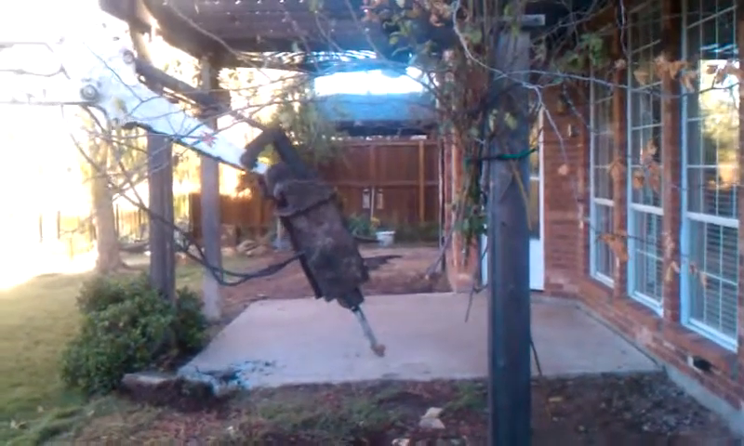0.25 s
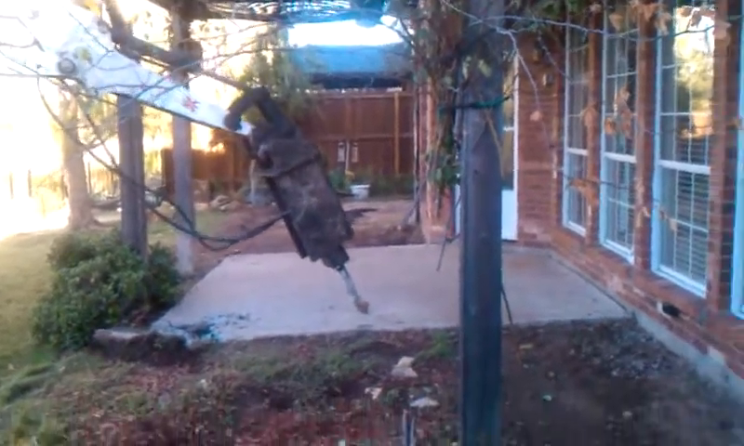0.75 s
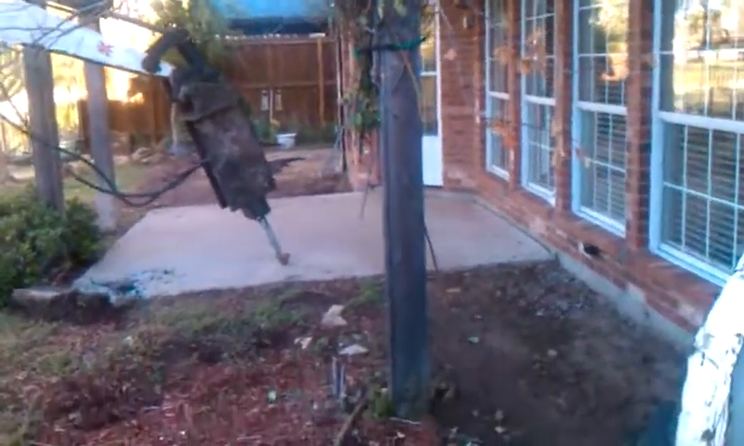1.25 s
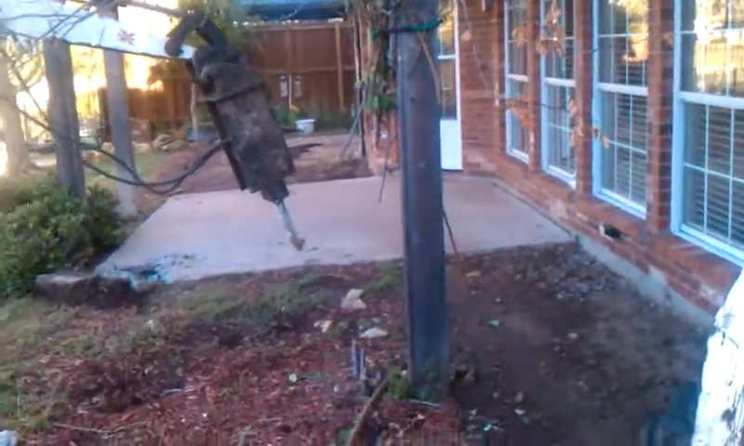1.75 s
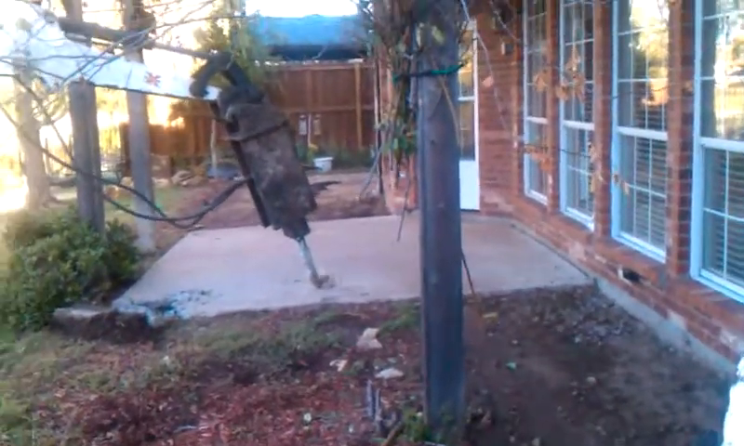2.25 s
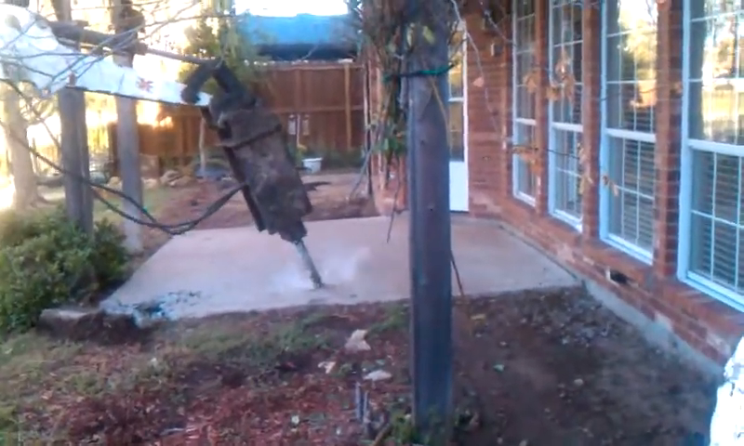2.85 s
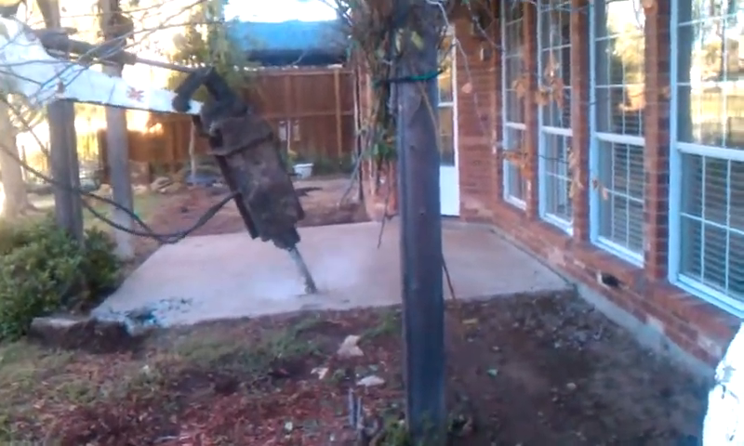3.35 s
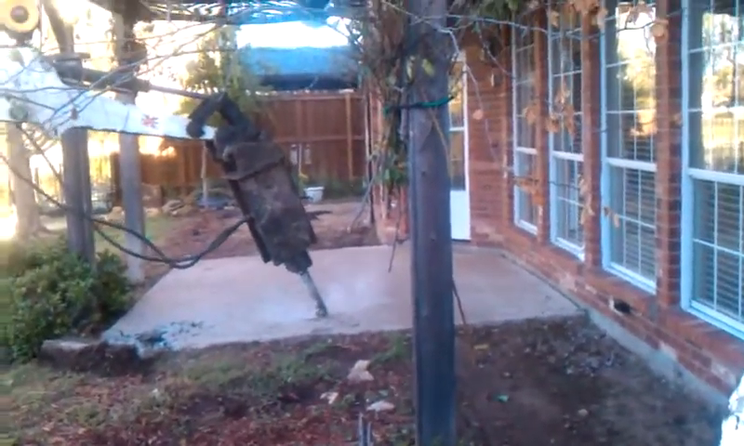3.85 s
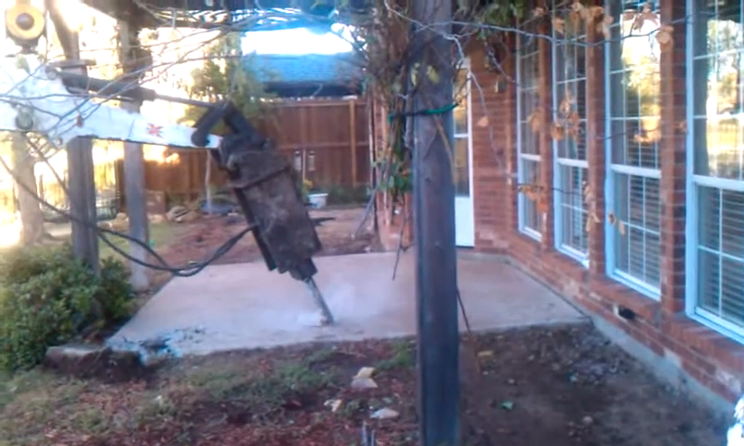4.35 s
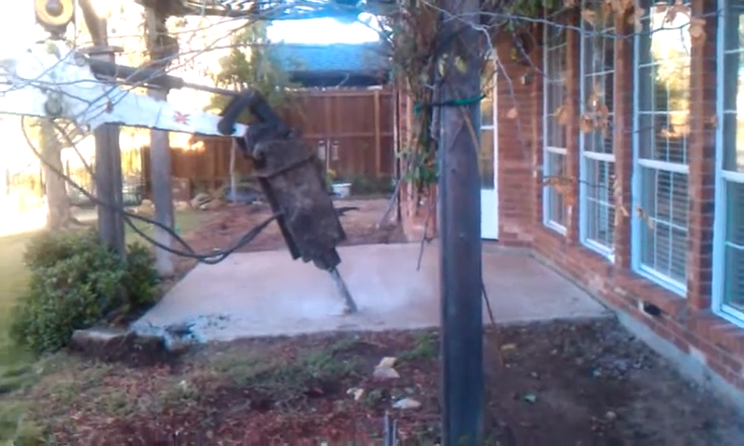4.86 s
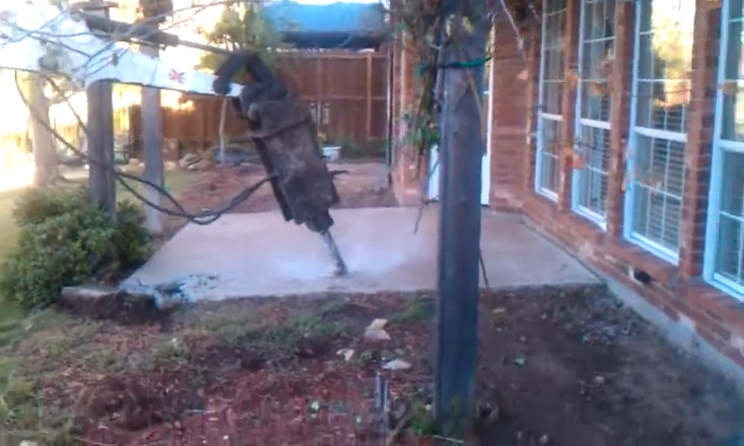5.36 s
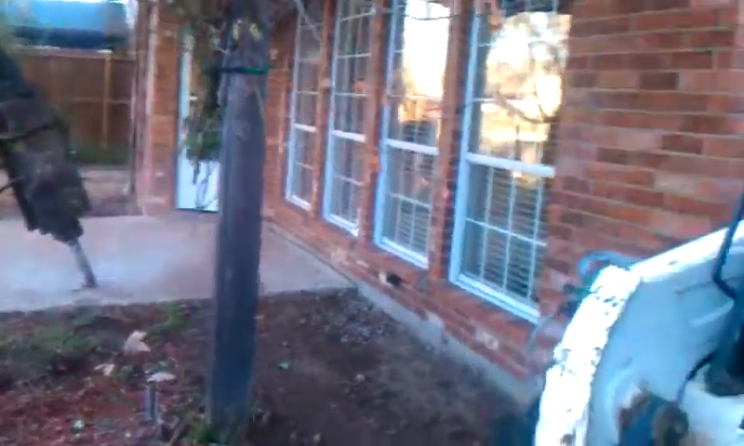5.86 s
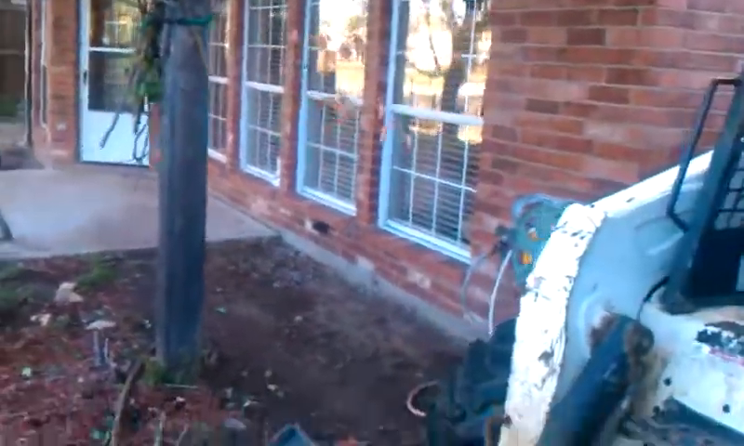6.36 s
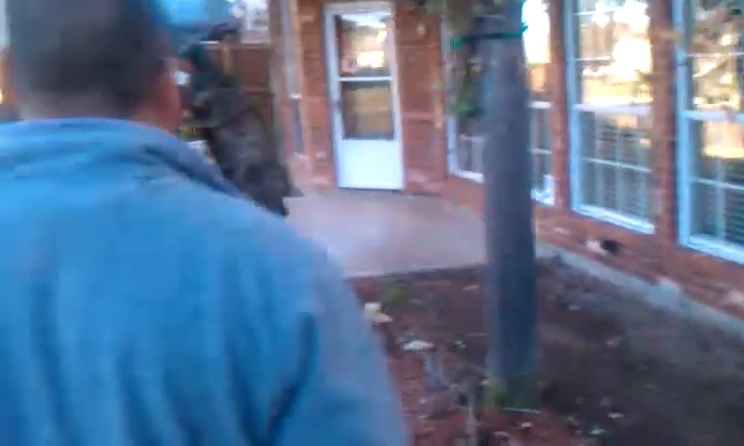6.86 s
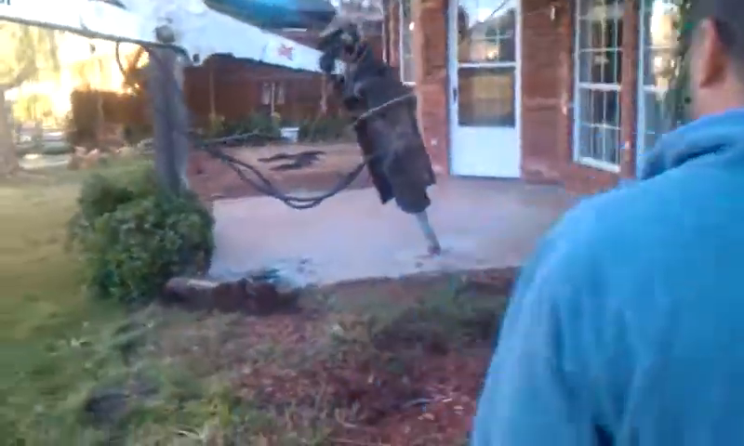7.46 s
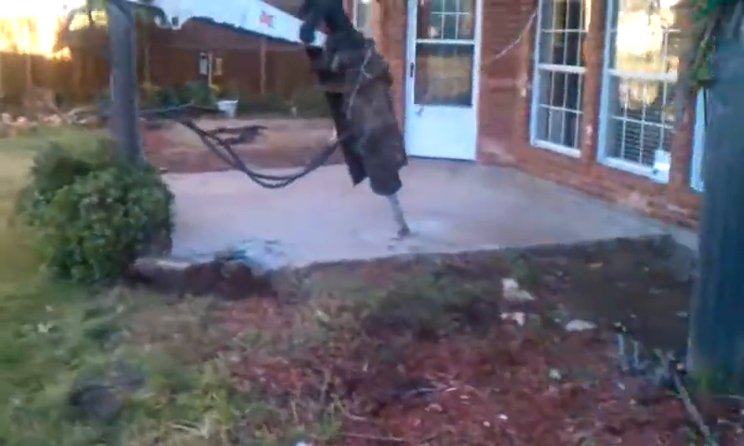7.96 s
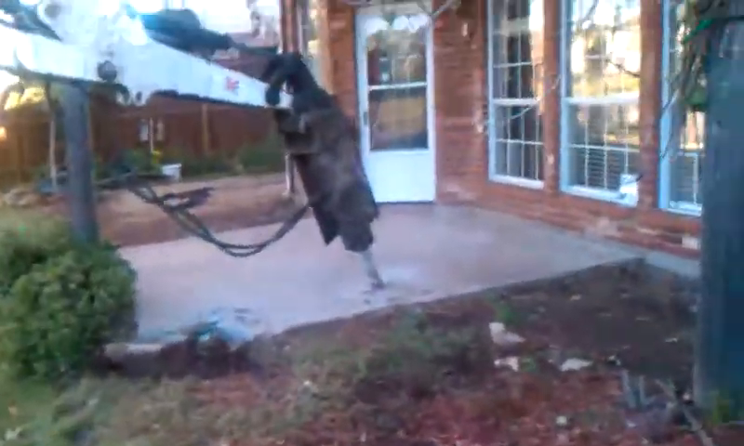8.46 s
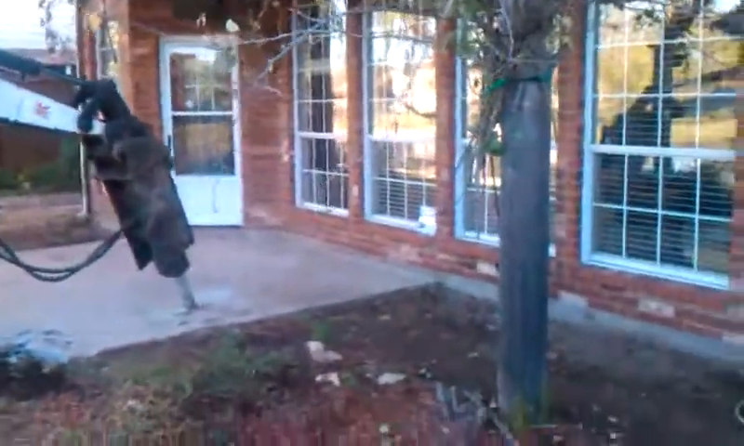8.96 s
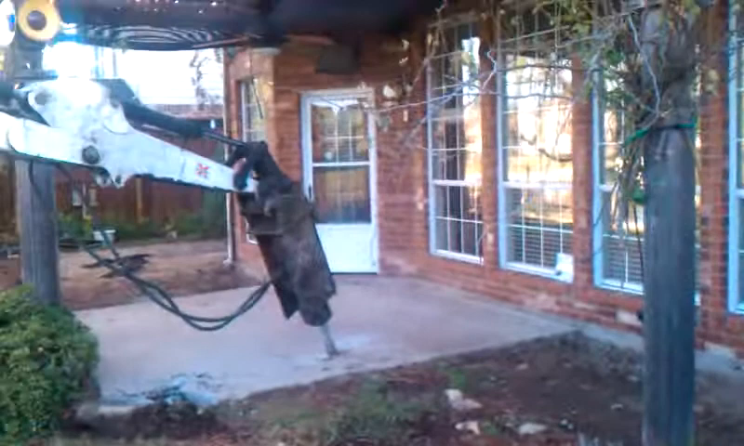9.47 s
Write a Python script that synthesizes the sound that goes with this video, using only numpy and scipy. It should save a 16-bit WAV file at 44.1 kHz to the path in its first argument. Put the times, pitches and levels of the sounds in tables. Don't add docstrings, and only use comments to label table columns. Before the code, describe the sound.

Loader engine chugging and boom knocks give way to a steel chisel pounding a patio slab about ten times a second, rattling and ringing continuously.

```python
import sys
import numpy as np
from scipy import signal
from scipy.fft import rfft, irfft
from scipy.io import wavfile

SR = 44100
rng = np.random.default_rng(int(sys.argv[2]) if len(sys.argv) > 2 else 0)


def gain_from_db(level_db):
    decades = np.asarray(level_db, float) / 20
    return 10 ** decades


def persist_wave(psi):
    counts = np.round(np.clip(psi, -1, 1) * 32767).astype(np.int16)
    wavfile.write(sys.argv[1], SR, np.atleast_2d(counts).T)


N = 429093

LANDING_S = 2.217
SKIP_S = 4.1993


def unit(x):
    return x / np.sqrt(np.mean(x ** 2) + 1e-20)


def in_time(rows):
    s, *columns = np.transpose(rows)
    return [np.interp(np.arange(N) / SR, s, c) for c in columns]


def at_hz(points, hz):
    point_hz, value = np.transpose(points)
    return np.interp(np.log(hz), np.log(point_hz), value)


def drift(rate):
    knots = rng.standard_normal(int(N / SR * 60))
    return unit(np.interp(np.arange(N) / SR * rate, np.arange(len(knots)), knots))


def clicks(times_s, heights):
    out = np.full(N, 1e-18)
    index = np.clip((np.ravel(times_s) * SR).astype(int), 0, N - 1)
    np.add.at(out, index, np.ravel(heights))
    return out


def ring(x, hz, t60_s):
    r, w = gain_from_db(-60 / (t60_s * SR)), 2 * np.pi * hz / SR
    return signal.lfilter([0, np.sin(w)], [1, -2 * r * np.cos(w), r * r], x)


def fade(power, t60_s):
    return signal.lfilter([1], [1, -gain_from_db(-120 / (t60_s * SR))], power)


def bands(grain_db):
    grain = gain_from_db(grain_db * rng.standard_normal((2, N // 32 + 1))).repeat(32, axis=1)[:, :N]
    white = rng.standard_normal((2, N)) * grain
    edges_hz = 28 * 2 ** np.arange(0, 7.6, 1 / 3)
    for k, (low, high) in enumerate(zip(edges_hz, edges_hz[1:])):
        sos = signal.butter(2, [low, high], "band", fs=SR, output="sos")
        yield np.sqrt(low * high), signal.sosfilt(sos, white[k % 2])


def narrow(centre_hz, width_hz):
    sos = signal.butter(2, width_hz / 2, fs=SR, output="sos")
    a, b = signal.sosfilt(sos, rng.standard_normal((2, N)))
    phase = 2 * np.pi * np.cumsum(centre_hz) / SR
    return unit(a * np.cos(phase) + b * np.sin(phase))


def engine():
    # start_s, firings_per_s, exhaust_db, block_hz
    running = [(0, 98, -47, 1750), (.3, 89.3, -48.5, 1760), (.9, 90.2, -41, 1714), (1.8, 90.8, -40.5, 1813),
               (2.21, 91.2, -45.5, 1872), (3.0, 120, -51, 1872), (6.3, 87, -50.5, 1807),
               (9.73, 86, -51, 1702)]
    # shaft_multiple, level_db
    orders = [(2, -4.5), (3, -21), (4, 0.5), (5, -9.5), (8, -5), (9, -5), (12, -4), (20, -5.5), (28, -5),
              (60, -4.5)]
    # band_hz, level_db_per_hz
    knock_colour = [(18, -55), (30, -24.5), (75, -10), (130, -14), (175, -9.5), (314, -12), (400, -9),
                    (896, -9.5), (1130, -8), (1750, -2), (2300, -6), (2800, -4.5), (3400, -16),
                    (4500, -21.5)]
    firing_hz, exhaust_db, block_hz = in_time(running)
    t = np.arange(N) / SR

    since_s = np.maximum(t - LANDING_S, 0)
    duck_db, duck_s, nearing_db_per_s = -10, 0.03, 0.5
    knock_db = -26 + duck_db * np.minimum(since_s / duck_s, 1) + nearing_db_per_s * since_s

    turns = np.cumsum(firing_hz / 2 * (1 + .0025 * drift(12))) / SR
    exhaust = 0
    for k, db in orders:
        exhaust = exhaust + gain_from_db(db + 1.9 * drift(18)) * np.sin(2 * np.pi * (k * turns + rng.random()))

    firing = (2 * turns).astype(int)
    strength = gain_from_db(2.0 * rng.standard_normal(1000))[firing]
    gate = 0.74 + strength * np.exp(-3.0 * (2 * turns % 1))
    knock = 0
    for hz, noise in bands(grain_db=0.7):
        share = np.clip(np.log(hz / 500) / 2.1, 0, 1)
        knock = knock + gain_from_db(at_hz(knock_colour, hz) + 1.3 * drift(14)) * gate ** share * noise

    strain_s, strain_db = 0.45, 3.5
    strain = np.interp(t, [LANDING_S - strain_s, LANDING_S], [0, 1], right=0)
    block = unit(gate * narrow(block_hz * (1 + .015 * drift(20)), width_hz=200))
    body = gain_from_db(2.0) * unit(knock) + gain_from_db(-4.5 + strain_db * strain) * block
    return np.sqrt(2) * gain_from_db(exhaust_db) * exhaust + gain_from_db(knock_db) * body


def linkage():
    # start_s, peak_db, pitch_hz, t60_s
    clunks = [
        (0.515, -17, 951, 0.036),
        (0.921, -14, 1250, .025),
        (0.927, -16, 448, 0.035),
        (0.94, -12.5, 205, 0.041),
        (1.862, -20.5, 172, .12),
        (2.219, -13, 1915, .12),
        (2.221, -19, 3450, 0.25),
        (2.22, -10.5, 1000, 0.015),
    ]
    out = 0
    for s, db, hz, t60_s in clunks:
        hit_and_bounce = clicks(s + np.array([0, .006]), gain_from_db(db + np.array([0, -7])))
        out = out + ring(hit_and_bounce, hz, t60_s)
    return out


def blows():
    # start_s, blows_per_s
    pace_curve = [(2.364, 9.059), (3.5, 8.604), (4.2, 9.253), (5.7, 9.474), (6, 9.591), (6.6, 9.655),
                  (7, 10.085), (8, 10.187), (8.4, 9.88), (8.9, 10.3), (9.73, 10.343)]
    # start_s, clatter_db, thud_over_clatter_db
    bite = [(2.2, -23, -11), (2.9, -24, -7.5), (3.9, -23, -3.5), (4.4, -24.5, -5.5), (5.6, -24.8, -4.5),
            (6.3, -24.5, -4), (6.5, -26.5, -10.5), (7.2, -23, -9.5), (8.6, -25, -10), (9.0, -24.5, -5.5),
            (9.73, -26.2, -4)]
    t, (pace,) = np.arange(N) / SR, in_time(pace_curve)
    first_s, skipped_blows = pace_curve[0][0], 0.192
    done = np.cumsum(pace * (t >= first_s)) / SR + skipped_blows * (t > SKIP_S)
    s = np.r_[LANDING_S, first_s, t[1:][np.diff(done.astype(int)) > 0]]
    luck = rng.standard_normal((len(s), 3)).T
    clatter_db, thud_db = (c[(s * SR).astype(int)] for c in in_time(bite))
    return s, clatter_db + 0.7 * luck[0], thud_db + 1.2 * luck[1], -13.5 + 3 * luck[2]


def contact_envelope(loose_s, contact_db, wet_db, t60_s):
    chance_db = 1.4 * rng.standard_normal(loose_s.shape)
    power = clicks(loose_s, gain_from_db(2 * (contact_db + chance_db)))
    return np.sqrt(fade(power, t60_s) + gain_from_db(2 * wet_db) * fade(power, 2.6))


def loose_clatter(loose_s, steel_db, clatter_db, thud_db, bright_db, place, wet_db):
    # band_hz, level_db_per_hz
    near = [(35, -43), (60, -16), (177, -7.5), (400, -4), (544, -11), (800, -8.5), (1470, -11.5),
            (1930, -11), (2800, -10.5), (3400, -9.5), (4500, -7)]
    side_on = [(35, -45), (60, -17.5), (177, -6.5), (400, -8), (675, -9), (885, -9.5), (1500, -9.5),
               (2070, -9.5), (2800, -11.5), (3500, -10.5), (4500, -6)]
    shadowed = [(35, -45.5), (60, -20), (168, -5.5), (294, -6.5), (380, -9.5), (1120, -10.5), (1470, -12.5),
                (1860, -10.5), (2800, -11), (3430, -11), (4500, -9)]
    # band_hz, t60_s
    decay = [(100, 0.37), (400, .22), (1500, 0.4), (3000, 0.36), (3600, 0.088), (4200, 0.13)]
    out = 0
    for hz, noise in bands(grain_db=0.33):
        low = np.interp(np.log(hz), np.log([300, 700]), [1, 0])
        high = np.interp(np.log(hz), np.log([2800, 3800]), [0, 1])
        blow_db = clatter_db + low * (thud_db + 7.5) + high * (bright_db + 15.5)
        blow = contact_envelope(loose_s, blow_db[:, None] + steel_db, wet_db - 3.1 * high, at_hz(decay, hz))
        colour_db = np.interp(place, [0, 1, 2], [at_hz(c, hz) for c in (near, side_on, shadowed)])
        rumble_cut_db = -3 * (140 < hz < 280)
        out = out + gain_from_db(colour_db + rumble_cut_db + 1.3 * drift(25)) * blow * noise
    return unit(out)


def struck(modes, when_s, blow_db, contact_db, shade, spread_db):
    out = 0
    for k, (hz, level_db, t60_s, shade_db) in enumerate(modes):
        luck = rng.standard_normal(when_s.shape)
        hit_db = (blow_db + shade * shade_db)[:, None] + contact_db + level_db + spread_db * luck
        out = out + (-1) ** k * ring(clicks(when_s, gain_from_db(hit_db)), hz, t60_s)
    return out


def thumps(s, level_db, shade):
    # delay_s, pitch_hz, over_thud_db, shadow_change_db
    pushes = [
        (.012, 178, 10, -5),
        (.016, 238, 6.5, -5),
        (.014, 386, 3, -6.5),
        (.066, 180, 1, 9.5),
        (0.069, 240, -2, 9),
    ]
    t60_s, rise_s = 0.095, 0.006
    out = 0
    for late_s, hz, db, shade_db in pushes:
        height = gain_from_db(level_db + db + shade * shade_db + 2.5 * rng.standard_normal(len(s))) / 2
        pair_s = s[:, None] + late_s + [0, round(rise_s * hz) / hz]
        out = out + ring(clicks(pair_s, np.c_[height, height]), hz, t60_s)
    return out


def breaker():
    # delay_s, slab_db, steel_db
    stroke = [
        (0.0, -6.5, 3.5),
        (0.012, -3, 3),
        (0.018, 2, 1.5),
        (0.026, -5.5, -5),
        (0.042, -1.5, 1.5),
        (0.062, -9.5, -3),
        (0.076, -1.5, -7),
    ]
    # pitch_hz, level_db, t60_s, shadow_change_db
    slab_modes = [(109, -12, 0.22, 0), (173, -5.5, 0.12, -4.5), (234.45, -5, .14, -2.5),
                  (309.6, -6.5, 0.091, -0.5), (387, 0, .15, -9.5), (467.3, -9.5, 0.23, -10.5),
                  (518.5, -9, 0.14, -2.5), (665.4, -1, .12, -18.5), (826.3, -3, 0.11, -7.5)]
    # pitch_hz, level_db, t60_s, shadow_change_db
    steel_modes = [(1000, -5.5, 0.21, -2.5), (1235, 1, 0.14, 7.5), (1510, -10.5, 0.24, 1.5),
                   (1950, -7, 0.088, -4), (2180, -8.5, 0.077, 2.5), (2373, -4.5, 0.28, 6),
                   (2760, -4.5, 0.11, 4.5), (3330, -3.5, 0.17, 7), (3450, -0.5, 0.11, 3)]
    # start_s, place (0 near, 1 side on, 2 shadowed)
    walk = [(2.2, 0.34), (3.0, 0.05), (4.1, .2), (4.5, 0.62), (6.1, 1.05), (6.35, 1.5), (6.62, 2.05),
            (6.82, 2.5), (7.0, 1.45), (8.5, 2.05), (9.73, 1.8)]
    # place, porch_db, steel_ring_db, housing_hz, housing_db
    place_table = [(0, -17.5, -2, 2050, -10), (.3, -20.5, -1.5, 2050, -9.5), (.62, -12, 0.5, 2100, -10),
                   (1.05, -11, -7, 2070, -16), (1.45, -13, -5.5, 1520, -8), (2.05, -11, -6, 1518, -8),
                   (2.5, -12.5, -4.5, 1950, -7.5)]
    s, clatter_db, thud_db, bright_db = blows()
    delay_s, slab_db, steel_db = np.transpose(stroke)
    place, = in_time(walk)
    places, *heard = np.transpose(place_table)
    wet_db, ring_db, housing_hz, housing_db = (np.interp(place, places, c) for c in heard)
    shade = np.clip(place[(s * SR).astype(int)] - 1, 0, 1)
    tight_s = s[:, None] + delay_s
    loose_s = tight_s + .0015 * rng.standard_normal(tight_s.shape) * (delay_s > 0)

    clatter = loose_clatter(loose_s, steel_db, clatter_db, thud_db, bright_db, place, wet_db)
    rattle = unit(contact_envelope(loose_s, clatter_db[:, None] + steel_db, wet_db - 4.0, 0.36))
    housing = rattle * narrow(housing_hz * (1 + .04 * drift(22)), width_hz=220)
    return_db = 4 * shade[:, None] * (delay_s > .07)
    thud = struck(slab_modes, tight_s, clatter_db + thud_db - 1.0, slab_db + return_db, shade, spread_db=1.5)
    steel = gain_from_db(ring_db) * struck(steel_modes, loose_s, clatter_db - 14.5, steel_db, shade, spread_db=6.0)
    noise = gain_from_db(-25) * (clatter + gain_from_db(housing_db + 2.3 * drift(18)) * housing)
    return noise + thud + steel + thumps(s, clatter_db + thud_db, shade)


def scene():
    return (breaker() + engine() + linkage())[None]


def low_pass(x):
    return signal.sosfilt(signal.butter(12, 15800, fs=SR, output="sos"), x)


def record(dry):
    # band_hz, level_db
    band_edge = [(3200, 0), (3500, -2.5), (3800, -7.5), (4050, -14), (4300, -23.5), (4500, -36),
                 (4640, -50.5), (4720, -99)]
    r = np.exp(-1 / (.009 * SR))
    level_db = 10 * np.log10(signal.lfilter([1 - r], [1, -r], dry ** 2) + 1e-4)
    x = dry * gain_from_db(-.45 * (level_db + 23))
    x = 0.46 * np.tanh(x / 0.44)
    x = signal.sosfilt(signal.butter(3, 45, "high", fs=SR, output="sos"), x)
    edge_db = np.interp(np.arange(N // 2 + 1) * SR / N, *np.transpose(band_edge), right=-200)
    tick = signal.lfilter([1], [1, -.6], clicks(SKIP_S, gain_from_db(-13)))
    return low_pass(irfft(rfft(x) * gain_from_db(edge_db), N) + tick)


dry = scene()
out = record(dry)
persist_wave(out)
```